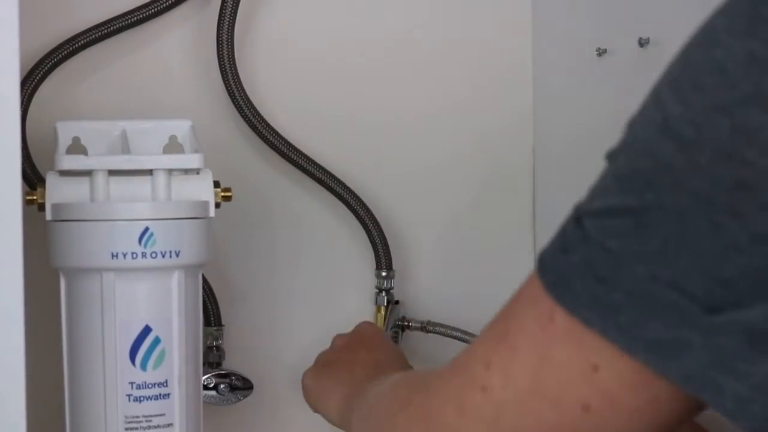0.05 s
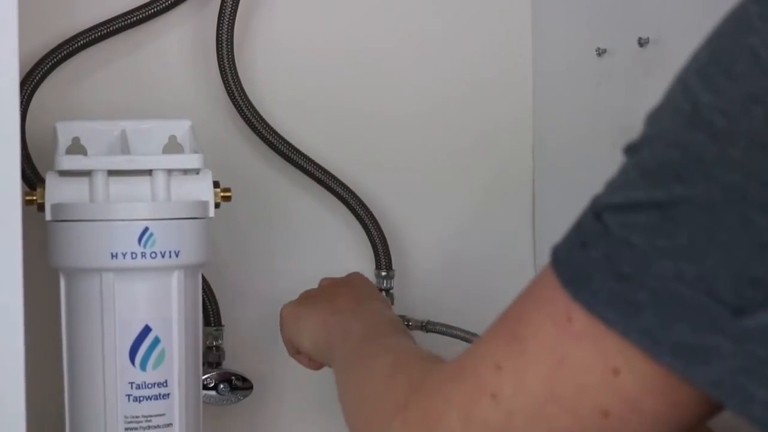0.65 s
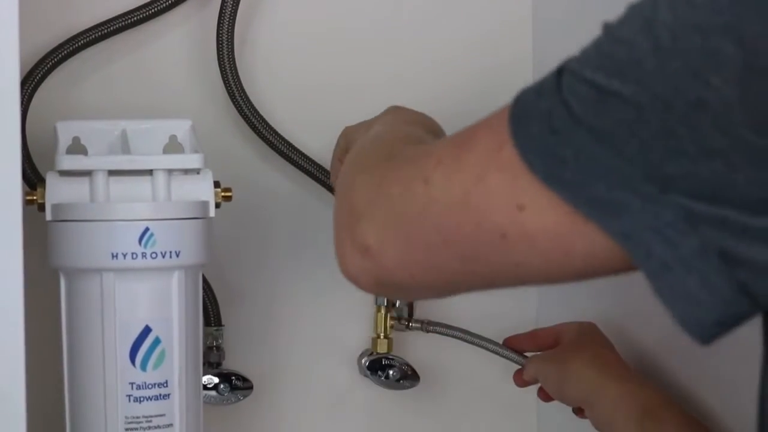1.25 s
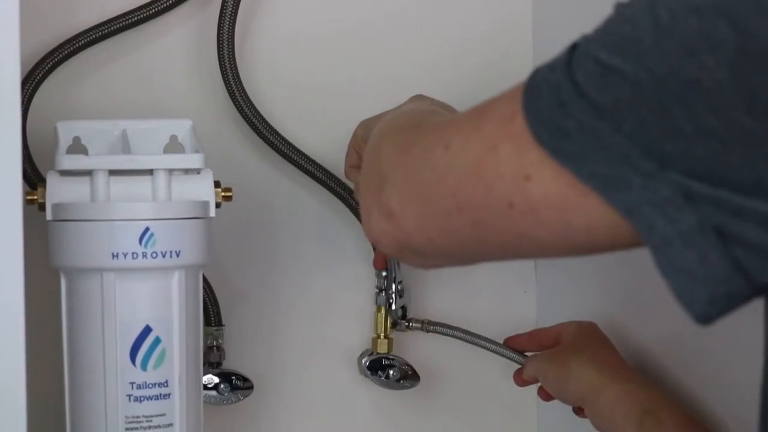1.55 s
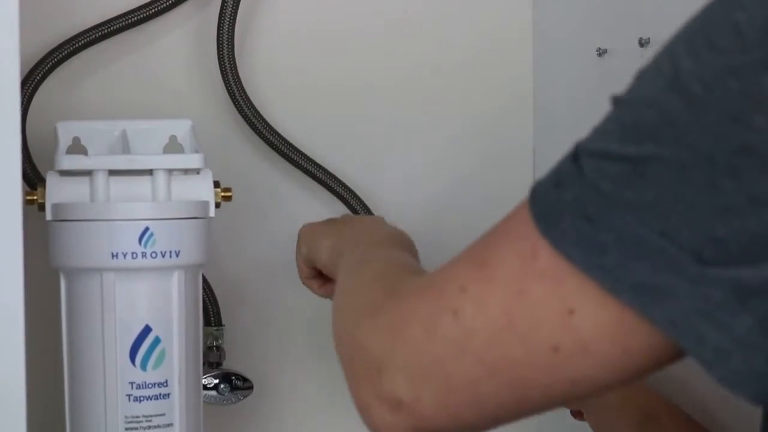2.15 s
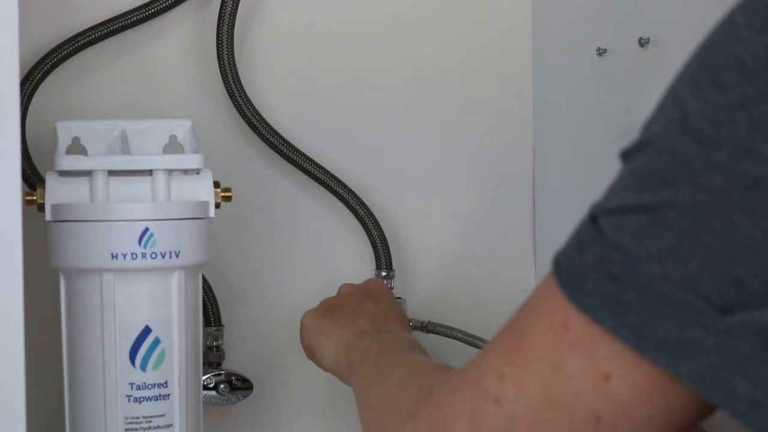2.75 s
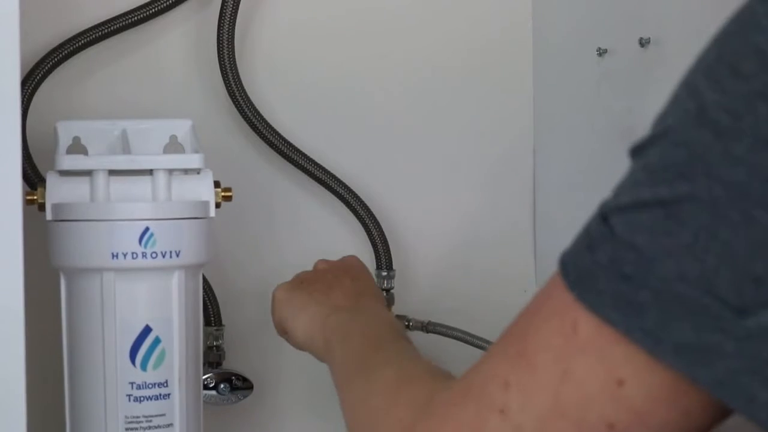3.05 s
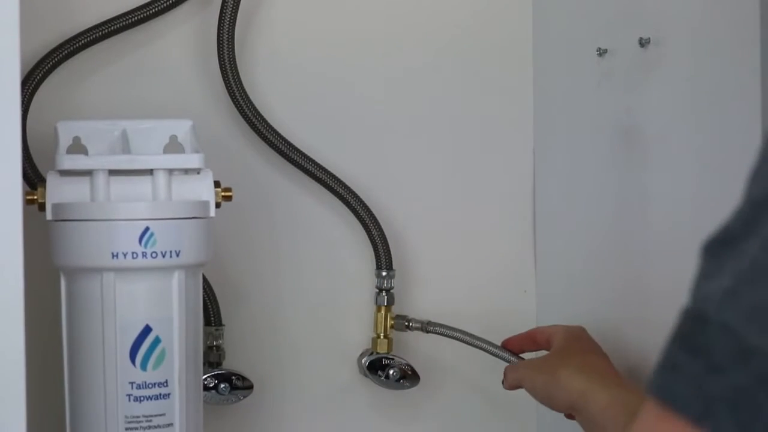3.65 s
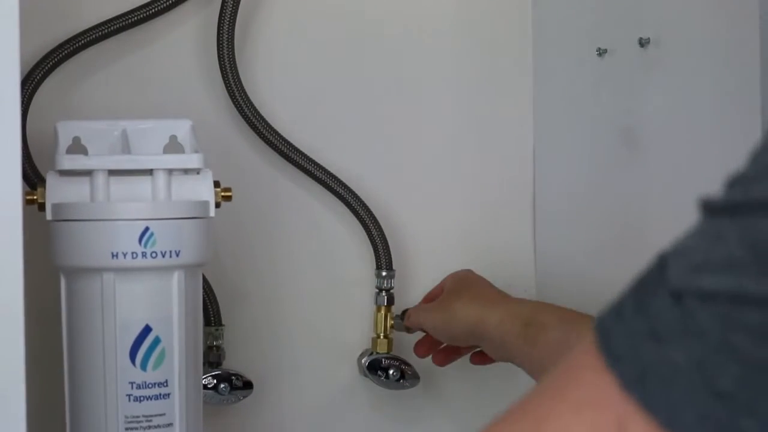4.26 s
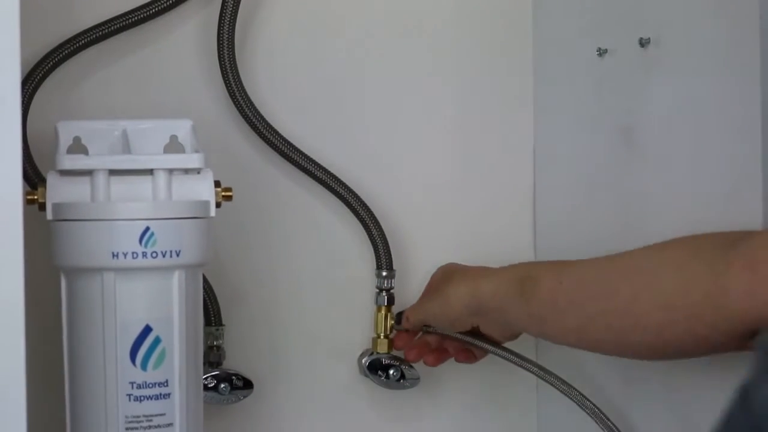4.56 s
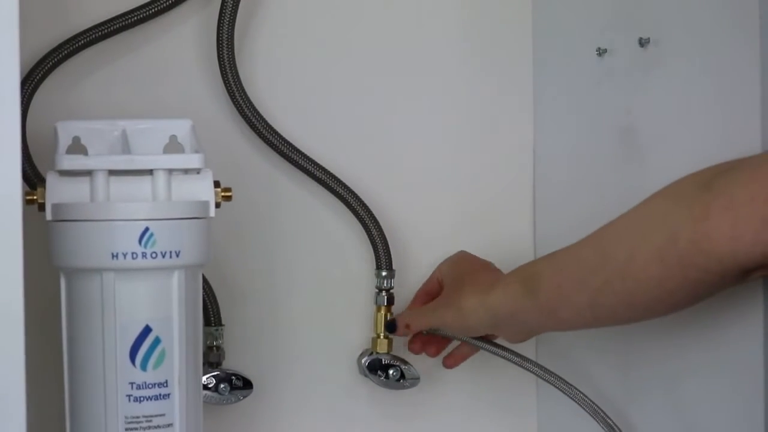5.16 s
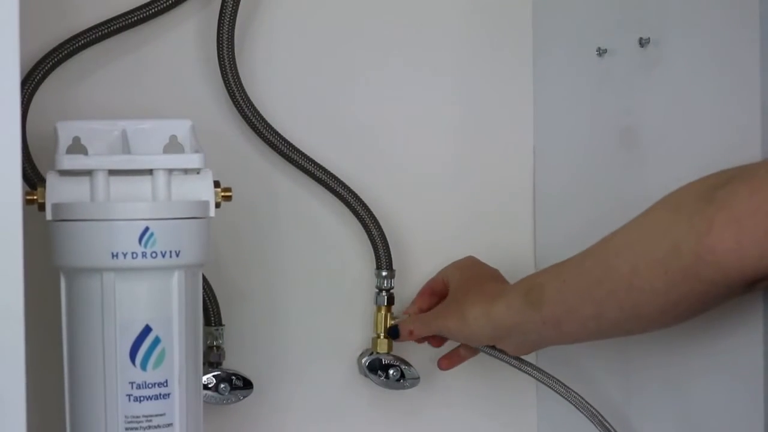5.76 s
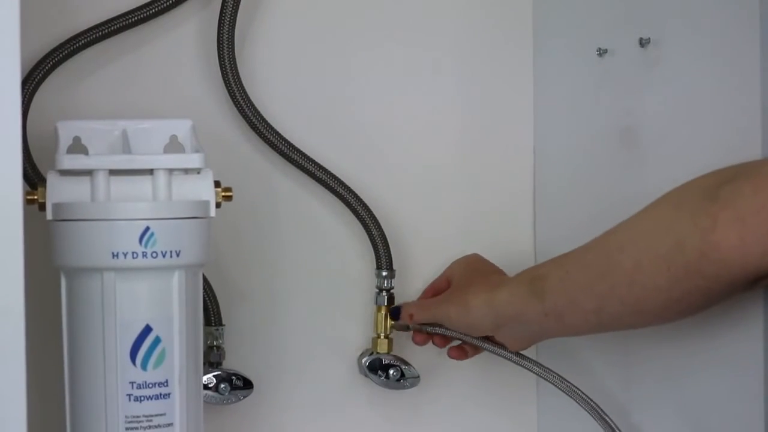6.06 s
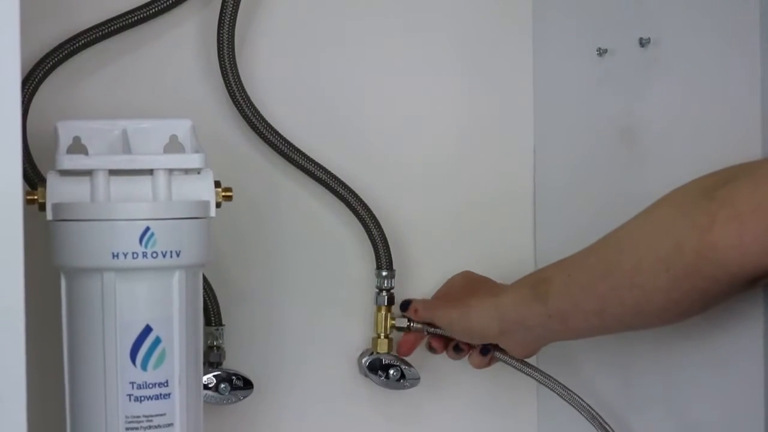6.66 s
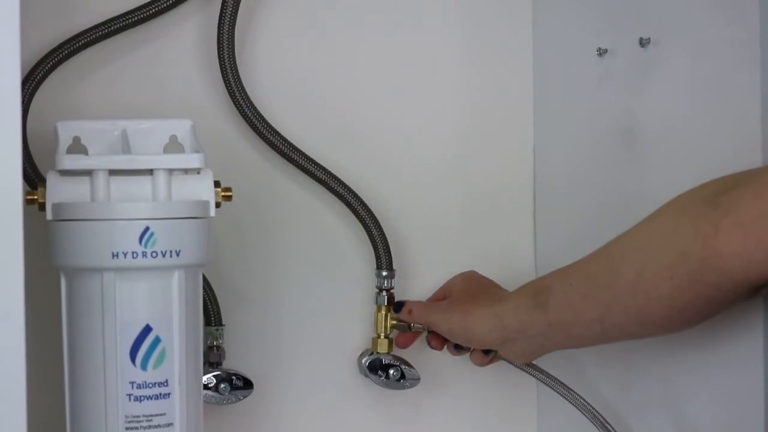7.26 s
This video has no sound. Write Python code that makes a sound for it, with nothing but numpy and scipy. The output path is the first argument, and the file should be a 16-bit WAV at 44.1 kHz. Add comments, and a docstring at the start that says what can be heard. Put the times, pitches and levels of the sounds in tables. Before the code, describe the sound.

Metallic clicks and short scrapes of a wrench loosening a pipe nut, a clunk as it is laid down, then light ticks.

```python
"""Wrench work under a kitchen sink

One microphone at the sink cabinet. A steel wrench clicks onto a hose nut and scrapes round in tiny
slips; the pipe carries each contact into the cabinet wall. The wrench is laid on the cabinet floor,
clinking, and fingers then turn the loose nut with small ticks. Close by, the cabinet gives dense early
echoes; farther out, the kitchen adds a soft tail and a faint steady hum."""
import sys
import numpy as np
from scipy import signal
from scipy.fft import rfft, irfft, next_fast_len
from scipy.io import wavfile
from scipy.ndimage import uniform_filter1d

SR = 44100
rng = np.random.default_rng(int(sys.argv[2]) if len(sys.argv) > 2 else 0)


def persist_wave(psi):
    """Save psi, clipped to +-1, as 16-bit WAV."""
    counts = np.round(np.clip(psi, -1, 1) * 32767).astype(np.int16)
    wavfile.write(sys.argv[1], SR, np.atleast_2d(counts).T)


N = 322812
TIME = np.arange(N) / SR
RING_TIME = np.arange(SR // 2) / SR
OVERTONE_RATIO = 1.98  # just under the octave

# modes of pipe, cabinet wall, gripped wrench and brass fitting: (frequency [Hz], level [dB], t60 [s])
PIPE_MODES = [(305, -7, .13), (385, -6, .12), (454, 2, .15), (518, -3, .11), (560, -3, .13), (640, -2, .1),
              (675, -2, .09), (738, -3, .11), (806, -6, .09), (926, -5, .11), (1130, -13, .07),
              (1240, -8, .08)]
WALL_MODES = [(80.7, 1, 0.75), (127, -25.5, 0.47), (146, -4, 0.58), (195.3, 10.5, 0.16), (212.7, 5.5, 0.24),
              (285, -9.5, 0.16)]
GRIPPED_MODES = [(2970, -3, .04), (3290, 0, .05), (3530, 0, .05), (3880, -3, .05), (4160, -6, .05),
                 (4690, 1, .05), (5570, 1, .05), (5700, -2, .03), (7940, -6, .04), (8890, 1, .025),
                 (9400, -1, .02), (12100, -1, .04)]
FITTING_MODES = [(935, -5, .04), (1130, -5, .03), (1215, 0, .045), (1290, -2, .035)]
# dense modes and cabinet echoes of a blow to pipe, wall and nut: (frequency [Hz], gain [dB])
PIPE_SPECTRUM = [(100, -38.5), (280, 8), (500, 8.5), (700, 12), (880, -13.5), (1280, -17), (1600, -22),
                 (2400, -34), (4000, -53)]
WALL_SPECTRUM = [(20, 0), (55, 6), (85, 14.5), (220, 15.5), (330, -15.5), (600, -64)]
NUT_KNOCK_SPECTRUM = [(150, 4.5), (450, 11), (900, 3), (1300, -3.5), (1800, -12), (3000, -33.5)]
# bright snap of metal on metal, and grit of steel sliding on the nut: (frequency [Hz], gain [dB])
SNAP_SPECTRUM = [(3000, -15.5), (6000, -4.5), (8900, 1), (10500, -9), (13000, -0.5), (16000, -10.5)]
GRIT_SPECTRUM = [(600, -31), (1500, 4), (2400, -5), (3400, 0), (4800, -4), (5700, -3), (7000, -12),
                 (9000, -14), (10600, -19), (12300, -19), (14000, -13), (16000, -37)]


def amp(db):
    """Decibels to gain."""
    return 10 ** (np.asarray(db) / 20)


def unit_rms(x):
    """Scales to rms 1."""
    return x / np.sqrt(np.mean(x ** 2) + 1e-20)


def unit_energy(x):
    """Scales to energy 1."""
    return x / np.sqrt(np.sum(x ** 2) + 1e-20)


def lookup(points, hz):
    """Reads a table on a log-frequency axis."""
    f, value = np.transpose(points)
    return np.interp(np.log(hz + 1), np.log(f), value)


def add(mix, s, sound):
    """Adds a sound into the mix at s seconds."""
    part = mix[max(round(s * SR), 0):][:len(sound)]
    part += sound[:len(part)]


def through(x, response):
    """Plays x through an impulse response."""
    return signal.oaconvolve(x, response)[:N]


def colour(x, spectrum):
    """Causal filter with the given spectrum."""
    size = next_fast_len(len(x) + SR // 8)
    log_gain = np.log(amp(lookup(spectrum, abs(np.fft.fftfreq(size, 1 / SR)))))
    response = np.exp(np.conj(signal.hilbert(log_gain)))[:size // 2 + 1]
    return irfft(rfft(x, size) * response, size)[:len(x)]


def resonate(x, hz, width_hz):
    """Two like resonances in series that follow the pitch curve hz."""
    turn = np.exp(2j * np.pi * np.cumsum(hz) / SR)
    pole = np.exp(-np.pi * width_hz / SR)
    for _ in range(2):
        x = 2 * (turn * signal.lfilter([1 - pole], [1, -pole], x / turn + 1e-18)).real
    return x


def dying_noise(t60s, t, count=8):
    """Dense echoes: noise whose bands each die at their own speed."""
    white, hz = rfft(rng.standard_normal(len(t))), np.fft.rfftfreq(len(t), 1 / SR)
    centres = np.geomspace(80, 15000, count)
    bands = [irfft(white * lookup(np.c_[centres, share], hz), len(t)) for share in np.eye(count)]
    return sum(band * amp(-60 * t / lookup(t60s, f)) for band, f in zip(bands, centres))


def ring(modes, in_step=False):
    """Damped modes: in step for a sharp attack, else of alternating sign."""
    t, sign = RING_TIME, 1 if in_step else -1
    sound = sum(sign ** k * amp(db - 60 * t / t60) * np.sin(2 * np.pi * hz * t)
                for k, (hz, db, t60) in enumerate(modes))
    low_cut = signal.butter(2, modes[0][0] / 2, "high", fs=SR)  # little radiates below the lowest mode
    return unit_energy(signal.lfilter(*low_cut, sound))


def blow(spectrum, direct=0.25, echo=0.45, echo_s=.002, build_s=.0016):
    """A tap as it reaches the microphone: the direct pulse, one cabinet wall echo, then dense echoes."""
    # ring time inside the cabinet: (frequency [Hz], t60 [s])
    cabinet_t60 = [(80, .3), (250, .15), (600, .085), (1500, .065), (5000, .052), (15000, .048)]
    taps = unit_energy(dying_noise(cabinet_t60, RING_TIME) * (1 - np.exp(-RING_TIME / build_s)))
    add(taps, 0, np.array([direct]))
    add(taps, echo_s, np.array([echo]))
    return unit_energy(colour(taps, spectrum))


def body(modes, spectrum, modal, in_step=False):
    """Clear modes, with the share modal of the energy, plus a dense spread that is new at each blow."""
    return unit_energy(np.sqrt(modal) * ring(modes, in_step) + np.sqrt(1 - modal) * blow(spectrum))


def scattered(sound, echoes=.9, echo_t60=0.025):
    """Echoes of a ringing tone interfere, so that it flutters as it dies."""
    taps = echoes * unit_energy(rng.standard_normal(len(RING_TIME)) * amp(-60 * RING_TIME / echo_t60))
    taps[0] += 1
    return unit_energy(signal.fftconvolve(sound, taps)[:len(RING_TIME)])


def regripped(modes, detune=.025, spread_db=2.5):
    """Each new grip shifts the modes a little in pitch and strength."""
    shifts = rng.standard_normal((len(modes), 2))
    return [(hz * (1 + detune * a), db + spread_db * b, t60)
            for (hz, db, t60), (a, b) in zip(modes, shifts)]


def gripped_ring(modes, pitch, db_per_octave=13):
    """The held steel rings most in the modes nearest the pitch of the contact."""
    focused = [(hz, db - db_per_octave * abs(np.log2(hz / pitch)), t60) for hz, db, t60 in modes]
    return scattered(ring(focused))


def slips(per_s, spread_db):
    """A random train of small jerks, as in stick and slip, rms 1."""
    size = amp(spread_db * np.minimum(rng.exponential(1, N), 3))
    return unit_rms(size * rng.choice([-1, 1], N) * (rng.random(N) < per_s / SR))


def stroke(length, crest, swell_db, fade_db, edge_s=0.0051):
    """Gain that swells up to its crest (a share of the length), then fades."""
    u = np.linspace(0, 1, round(length * SR))
    edges = np.minimum(np.minimum(u, 1 - u) * length / edge_s, 1)
    return edges * amp(np.interp(u, [0, crest, 1], [-swell_db, 0, -fade_db]))


def strokes(rows, crest, swell_db, fade_db):
    """Gain over time of like swells, silent between them."""
    gain = np.zeros(N)
    for s, length, db in rows:
        add(gain, s, amp(db) * stroke(length, crest, swell_db, fade_db))
    return gain


def room_tone(air_db=-66.5, waver=0.087):
    """Still kitchen air and the slightly wavering hum of an appliance."""
    # spectrum of the air, and tones of the hum: (frequency [Hz], level [dB])
    air_spectrum = [(12, -31.5), (20, -5.5), (87, -7), (126, -7), (153, -11), (202, -10.5), (324, -16.5),
                    (352, -9.5), (382, -16.5), (519, -16.5), (932, -26), (1230, -27.5), (1340, -32),
                    (3450, -39), (15500, -44.5)]
    hum_tones = [(355.3, -70.5), (517, -87)]
    out = amp(air_db) * unit_rms(colour(rng.standard_normal(N), air_spectrum))
    for hz, db in hum_tones:
        drift = unit_rms(uniform_filter1d(rng.standard_normal(N), SR // 6))
        out += amp(db) * np.sqrt(2) * (1 + waver * drift) * np.sin(2 * np.pi * hz * TIME)
    return out


def soft_bumps(rise_s=0.0073):
    """Handling bumps: low tones that swell and die almost at once."""
    # bumps: (time [s], level [dB], pitch [Hz])
    bumps = [(0.074, -40, 56), (0.126, -43.5, 50), (2.824, -43, 186), (4.78, -56, 169), (4.87, -41.5, 62.4),
             (4.89, -45.5, 95), (4.966, -51, 115.5), (5.224, -54, 43.9), (5.253, -51, 47.2),
             (6.414, -52, 68), (6.429, -58, 138), (6.471, -55.5, 76), (6.555, -56, 109)]
    out, u = np.zeros(N), RING_TIME / rise_s
    for s, db, hz in bumps:
        add(out, s, -amp(db) * u * np.exp(1 - u) * np.sin(2 * np.pi * hz * RING_TIME))
    return out


def wrench_contacts(knock_db=17, thud_db=26, click_db=27, ring_db=24, fitting_db=20, snap_db=22):
    """Each contact clicks and rings in steel and fitting, then knocks the pipe and shakes the wall."""
    # wrench meets nut: (time [s], pipe knock [dB], wall thud [dB], steel click [dB], steel ring [dB],
    # ring pitch [Hz], fitting ring [dB], snap [dB])
    contacts = [(0.0747, -34, -42, -68, -67, 3520, -67, -63.5),
                (0.246, -36, -46, -62.5, -72, 4740, -57, -58),
                (0.258, -39.5, -47, -70, -60, 3250, -60, -55), (1.194, -84, -69, -71, -68, 2980, -80, -59),
                (1.2488, -21, -35, -50.5, -48.5, 5950, -40, -47),
                (1.2666, -31, -32, -47.5, -52, 5600, -36, -39),
                (1.457, -20, -34.5, -37.5, -48, 4080, -33, -43),
                (1.802, -29, -37.5, -69, -72, 5700, -51, -76), (1.962, -54, -59, -90, -87, 3330, -64, -88),
                (2.087, -43.5, -54, -73.5, -63.5, 4900, -54.5, -86),
                (2.512, -70, -44, -74, -82, 4700, -68, -90), (2.529, -48.5, -50, -88, -73, 3100, -66, -85),
                (2.683, -42, -52, -74, -68.5, 3550, -62, -87),
                (2.691, -40.5, -62, -68, -73, 4700, -68, -78),
                (2.729, -52, -46.5, -80, -69, 3700, -68, -85), (2.825, -48, -45, -95, -92, 3350, -70, -95),
                (3.003, -28.5, -58, -53, -53, 5500, -44, -82),
                (3.037, -36.5, -74, -72, -63, 5600, -62, -73),
                (3.092, -26.5, -47, -64, -56, 3500, -61, -54),
                (3.733, -52.5, -66, -94, -96, 3300, -91, -95)]
    # steel click: (frequency [Hz], gain [dB])
    click_spectrum = [(600, -38), (1500, 2.5), (2300, 0), (2750, 0.5), (3400, 4), (4100, 3.5), (4800, 5),
                      (5700, 4.5), (7000, -14.5), (9000, -10), (10600, -23), (12300, -7), (14000, -33),
                      (16000, -21)]
    pipe_lag_s, wall_lag_s = 0.001896, 0.00338
    out = np.zeros(N)
    for s, knock, thud, click, steel, pitch, fitting, snap in contacts:
        pipe = body(PIPE_MODES, PIPE_SPECTRUM, modal=0.34, in_step=True)
        wall = body(WALL_MODES, WALL_SPECTRUM, modal=0.72)
        add(out, s + pipe_lag_s, amp(knock + knock_db) * pipe)
        add(out, s + wall_lag_s, amp(thud + thud_db) * wall)
        add(out, s, amp(click + click_db) * blow(click_spectrum, direct=0.26, echo=0.12))
        add(out, s, amp(snap + snap_db) * blow(SNAP_SPECTRUM))
        add(out, s, amp(steel + ring_db) * gripped_ring(GRIPPED_MODES, pitch))
        add(out, s, amp(fitting + fitting_db) * ring(regripped(FITTING_MODES)))
    return out


def nut_ticks(tick_db=15, knock_db=17, snap_db=6, ping_db=13, overtone_db=-20.5):
    """The slack nut taps its thread; the fingers damp its ring."""
    # light taps: (time [s], dry tick [dB], ring [dB], ring pitch [Hz], pipe knock [dB])
    taps = [(0.1353, -66, -59.5, 3830, -51), (0.2087, -70, -65, 3600, -51), (4.241, -75, -58, 3020, -83),
            (3.387, -68, -50.5, 2100, -84), (3.4405, -64, -68, 1980, -77),
            (4.9338, -53.5, -55, 3320, -48.5), (5.0311, -68, -59.5, 3487, -50.5),
            (5.503, -66, -67, 3630, -74), (5.7422, -60.5, -61, 2720, -51), (5.781, -51.5, -51, 3280, -50),
            (5.7888, -50, -47, 1830, -46), (6.121, -72, -69, 1880, -51), (6.407, -82, -82, 3000, -53),
            (6.4311, -75, -64, 3280, -50), (6.458, -79, -71, 2900, -57), (6.4746, -72, -61, 1850, -58),
            (6.503, -65.5, -68, 3670, -57), (6.555, -65, -58.5, 3100, -60), (6.759, -80, -69, 2830, -80),
            (6.784, -66, -55.5, 3150, -80), (6.787, -72, -60, 2590, -89), (6.819, -69, -80, 2780, -79),
            (6.926, -75, -78, 4270, -73), (6.936, -67.5, -63, 3130, -78), (6.9774, -69, -64, 3850, -78),
            (7.107, -64.5, -60.5, 2400, -54), (7.127, -77, -66, 3200, -52.5), (7.165, -54, -69, 3260, -50),
            (7.169, -39.5, -42, 3930, -52.5), (7.231, -71, -62.5, 2840, -51.5)]
    # dry tick: (frequency [Hz], gain [dB])
    tick_spectrum = [(500, -39.5), (1000, -2), (1320, 18), (2200, -4.5), (3800, 10), (5200, 8.5),
                     (6500, -12), (8000, -0.5), (10000, -11.5), (13000, -4.5), (16000, -36)]
    out = np.zeros(N)
    for s, db, ring_db, hz, knock in taps:
        tick = blow(tick_spectrum, direct=.4, echo=0.3, build_s=0.001)
        ping = scattered(ring([(hz, 0, .022), (hz * OVERTONE_RATIO, overtone_db, .014)]))
        add(out, s, amp(db + tick_db) * tick + amp(ring_db + ping_db) * ping)
        add(out, s, amp(knock + knock_db) * blow(NUT_KNOCK_SPECTRUM, direct=.1, echo=0.083))
        add(out, s, amp(db + snap_db) * blow(SNAP_SPECTRUM))
    return out


def scrapes(groan_db=-5, judder_db=-5, rumble_db=-3, grit_db=-4, rasp_db=-6, sing_db=-4):
    """Jaws slide on nut, or nut on thread: fine slips shake pipe and wall, coarse ones the metal."""
    # strokes: (start [s], length [s], crest [share of length], pipe groan [dB], judder [dB],
    # wall rumble [dB], steel grit [dB], fitting ring [dB], judder pitch [Hz], glide [octaves])
    moves = [(0.481, 0.034, 0.27, -42.5, -69, -35, -68, -47.5, 1030, 0.25),
             (0.501, 0.063, 0.63, -41.5, -46, -40, -60, -54, 725, -0.34),
             (0.567, 0.044, 0.17, -48.5, -46, -36, -63, -53, 660, -0.25),
             (0.62, 0.0792, 0.4, -45.5, -41.5, -41, -59.5, -45, 700, 0.27),
             (1.347, 0.098, 0.14, -51, -41.5, -45, -85, -58, 700, 0.45),
             (1.391, 0.082, 0.43, -31.5, -30, -41, -53, -46, 707, -0.35),
             (1.689, 0.086, 0.68, -37.5, -38, -35, -60, -50, 920, 0.18),
             (1.73, 0.08, 0.35, -42, -38, -45.5, -61, -44, 885, 0.36),
             (1.954, 0.061, 0.053, -53, -56.5, -48.5, -100, -72, 920, -0.23),
             (2.251, 0.11, 0.99, -53, -57, -55.5, -76, -66, 730, -0.41),
             (2.507, 0.065, 0.3, -53, -53.5, -71, -76, -61.5, 660, 0.19),
             (2.695, 0.11, 0.23, -52, -60, -47.5, -81, -64.5, 650, 0.093),
             (2.944, 0.068, 0.78, -39.5, -45, -40, -64.5, -64, 620, -0.18),
             (3.008, 0.048, 0.7, -35, -40, -63, -57, -48, 660, -0.31),
             (3.031, 0.066, 0.74, -29.5, -32, -53, -56.5, -50, 543, -0.42),
             (6.87, 0.062, 0.35, -74, -55, -75, -89, -88, 520, -0.35),
             (7.178, 0.13, 0.69, -60.5, -56, -64.5, -79, -78, 467, 0.066)]
    # the rasping nut: (frequency [Hz], level [dB], t60 [s])
    rasp_modes = [(1850, 0, .015), (2230, -3, .015), (2970, -1, .022), (3335, 2, .03), (3530, -3, .02),
                  (4270, -6, .015), (4610, -4, .02), (5150, -7, .02), (5480, -6, .02), (5910, -8, .02)]
    fine, coarse = slips(per_s=900, spread_db=4), slips(per_s=320, spread_db=3)
    pipe, judder, wall, steel, sing = np.zeros((5, N))
    for s, length, crest, on_pipe, on_judder, on_wall, on_steel, on_fitting, hz, glide in moves:
        grip = stroke(length, crest, swell_db=23, fade_db=11.5)  # tightens, then slackens
        jerks = unit_rms(fine[round(s * SR):][:len(grip)])
        crackle = unit_rms(coarse[round(s * SR):][:len(grip)])
        add(pipe, s, amp(on_pipe) * grip * jerks)
        add(wall, s, amp(on_wall) * grip * jerks)
        add(steel, s, amp(on_steel) * grip * crackle)
        nut = amp(on_steel + rasp_db) * ring(regripped(rasp_modes))
        fitting = amp(on_fitting + sing_db) * ring(regripped(FITTING_MODES))
        add(sing, s, signal.fftconvolve(grip * crackle, nut + fitting))
        # the slips bunch round a pitch that glides during the stroke
        pitch = hz * 2 ** (glide * np.linspace(-.5, .5, len(grip)))
        add(judder, s, amp(on_judder) * grip * unit_rms(resonate(jerks, pitch, width_hz=160)))
    echoes = scattered(signal.unit_impulse(len(RING_TIME)), echoes=1.0, echo_t60=0.03)
    judder = amp(judder_db) * through(judder, echoes)
    groan = amp(groan_db) * through(pipe, body(PIPE_MODES, PIPE_SPECTRUM, modal=1.0))
    rumble = amp(rumble_db) * through(wall, body(WALL_MODES, WALL_SPECTRUM, modal=0.51))
    grit = amp(grit_db) * through(steel, blow(GRIT_SPECTRUM, direct=0.2, echo=0.76))
    return groan + judder + rumble + grit + sing


def wrench_catches(tick_db=10, ring_db=8, knock_db=14):
    """Within a scrape the jaws snag on a corner of the nut and let go with sharp ticks."""
    # snags: (time [s], steel tick [dB], pipe knock [dB], ring pitch [Hz])
    catches = [(0.492, -67, -42, 3240), (0.526, -65, -34, 3400), (0.5461, -59, -44, 4700),
               (0.5868, -57, -47, 3100), (0.633, -58, -39, 4600), (0.645, -59, -37, 3400),
               (0.6536, -64, -50, 3500), (0.678, -52, -43, 3600), (1.42, -45, -29.5, 9200),
               (1.699, -72, -38, 3300), (1.723, -57, -44, 3230), (1.7405, -47, -40, 3300),
               (1.751, -46.5, -44, 3400), (1.762, -48, -32, 9400), (1.784, -46.5, -48, 3400),
               (2.964, -64, -43, 4700), (2.985, -67, -46, 3500)]
    out = np.zeros(N)
    for s, steel, knock, pitch in catches:
        add(out, s, amp(steel + tick_db) * blow(GRIT_SPECTRUM, direct=.7, echo=.4, build_s=.0008))
        add(out, s, amp(steel + ring_db) * gripped_ring(regripped(GRIPPED_MODES), pitch))
        add(out, s, amp(knock + knock_db) * blow(NUT_KNOCK_SPECTRUM, direct=0.23, echo=.4))
    return out


def sleeve_brushes(gain_db=1):
    """The sleeve brushes as the arm moves: dense slips merge into a rustle."""
    # arm moves: (start [s], length [s], level [dB])
    moves = [(0.66, 0.38, -73.5), (3.2, 0.33, -73), (4.53, 0.47, -71.5), (4.95, 0.38, -75.5)]
    # cloth: (frequency [Hz], gain [dB])
    cloth_spectrum = [(300, -10), (900, 11.5), (2000, 5.5), (3500, -0.5), (8000, -6), (13000, -10),
                      (16000, -18)]
    rustle = unit_rms(colour(slips(per_s=5200, spread_db=0), cloth_spectrum))
    return amp(gain_db) * strokes(moves, crest=0.52, swell_db=8, fade_db=8) * rustle


def afterrings(swell_s=0.0062, t60_s=0.47):
    """A faint, fuzzy ring and its overtone linger after some contacts."""
    # lingering rings: (time [s], level [dB], pitch [Hz], overtone [dB])
    rings = [(0.681, -78, 2240, -2), (1.457, -62, 3620, -40), (1.458, -77, 5300, -30),
             (5.785, -78, 4728, -21), (7.167, -77, 3850, 3), (7.17, -77, 5130, -30.5)]
    out, t = np.zeros(N), RING_TIME
    fade = (1 - np.exp(-t / swell_s)) * amp(-60 * t / t60_s)
    for s, db, hz, overtone_db in rings:
        for pitch, level in (hz, db), (hz * OVERTONE_RATIO, db + overtone_db):
            band = resonate(rng.standard_normal(len(t)), np.full(len(t), pitch), width_hz=540)
            add(out, s, amp(level) * fade * unit_rms(band))
    return out


def wrench_slide_off():
    """Leaving the nut, the wrench is held loosely and the slips make its steel sing."""
    # the slide: (start [s], length [s], level [dB])
    slide = [(3.012, .098, -56)]
    # loosely held steel: (frequency [Hz], level [dB], t60 [s])
    loose_modes = [(5680, 0, .02), (8850, -2, .014), (9400, -5, .01), (12300, -9, .008)]
    drive = strokes(slide, crest=0.75, swell_db=32, fade_db=12) * slips(per_s=1000, spread_db=2)
    return through(drive, scattered(ring(loose_modes)))


def rattling(sound, cutoff_hz=110, depth=.55):
    """The wrench chatters on the board, so that its ring flutters."""
    chatter = signal.lfilter(*signal.butter(2, cutoff_hz, fs=SR), rng.standard_normal(len(sound)))
    return unit_energy(sound * (1 + depth * unit_rms(chatter)))


def wrench_set_down(knock_db=12, slap_db=17, clack_db=22, hard_db=21, shank_db=24, jaws_db=22,
                    snap_db=18):
    """The wrench touches the cabinet's floor board, rocks and drops flat, ringing freely."""
    # landings: (time [s], slap [dB], board ring [dB], clack [dB], shank [dB], jaws [dB], snap [dB])
    landings = [(3.883, -14, -17, -41.5, -57, -79, -71), (3.894, -44.5, -37, -63.5, -72.5, -61, -56),
                (3.905, -23, -29, -45.5, -69, -72, -72), (3.908, -30.5, -31.5, -43.5, -46.5, -32.5, -35),
                (3.99, -52, -52.5, -67.5, -64.5, -72, -62), (4.085, -47.5, -42.5, -71.5, -82.5, -94.5, -90),
                (4.098, -47.5, -37.5, -65.5, -68.5, -83.5, -76),
                (4.152, -35, -26, -61.5, -69.5, -84, -72.5), (4.186, -42.5, -27, -62.5, -68.5, -87, -77),
                (4.2789, -32.5, -26.5, -40.5, -35.5, -52, -41), (4.297, -47, -41, -60.5, -47, -58.5, -54),
                (4.3208, -14, -13.5, -18, -46, -42, -38.5), (4.328, -27, -23.5, -33, -48, -36, -36),
                (4.344, -30, -25.5, -40.5, -43, -44, -39.5)]
    # modes of board, board when hit hard, shank and jaws: (frequency [Hz], level [dB], t60 [s])
    board_modes = [(400, -16, .07), (560, -1, .14), (608, -2, .1), (680, -6, .05), (736, 0, .12),
                   (804, -2, .09), (925, -8, .05), (1082, -7, .07), (1350, -9, .045)]
    hard_modes = [(216, -2, .13), (255, -6, .1), (340, -2, .09), (458, 4, .11), (1020, -1, .04),
                  (1248, 1, .07), (1470, 5, .05), (1560, -3, .03), (1703, 2, .05), (1916, 0, .04),
                  (2130, -3, .025), (2390, 0, .03), (2950, -1, .02), (3500, -2, .018), (4650, -2, .016)]
    shank_modes = [(5528, -9, .045), (5556, 0, .068), (5640, -6, .03)]
    jaw_modes = [(8720, -15, .04), (8850, -13, .07), (8960, -14, .04), (9440, -16, .04), (12050, -14, .025),
                 (13100, -13, .025), (14300, -4, .025), (14470, 0, .04), (14640, -1, .03), (14850, -6, .02)]
    # slap and hard clack on the board: (frequency [Hz], gain [dB])
    slap_spectrum = [(50, -41), (110, -21), (200, -18.5), (300, -13), (480, 2.5), (740, 3.5), (950, -2.5),
                     (1350, -8), (1900, -20.5), (3500, -51.5)]
    clack_spectrum = [(100, -23.5), (200, -1), (400, -3.5), (700, -4.5), (1000, 7), (1500, 3.5),
                      (2500, 4.5), (4500, -4.5), (5600, -6), (7000, -15), (10500, -21.5), (13000, -10.5),
                      (16000, -31.5)]
    out = np.zeros(N)
    for s, slap, knock, clack, shank, jaws, snap in landings:
        add(out, s, amp(knock + knock_db) * ring(board_modes, in_step=True))
        add(out, s, amp(slap + slap_db) * blow(slap_spectrum, direct=1.0, echo=1.7, echo_s=.0014))
        add(out, s, amp(clack + clack_db) * blow(clack_spectrum, direct=0.54, echo=0.18, echo_s=.0022))
        add(out, s, amp(clack + hard_db) * ring(hard_modes))
        add(out, s, amp(shank + shank_db) * rattling(ring(shank_modes)))
        add(out, s, amp(jaws + jaws_db) * rattling(ring(jaw_modes)))
        add(out, s, amp(snap + snap_db) * blow(SNAP_SPECTRUM))
    return out


def dry_snaps(gain_db=3):
    """Tiny snaps close to the microphone: one high mode that dies at once."""
    # snaps: (time [s], level [dB])
    snaps = [(4.623, -50), (4.6997, -59), (4.7848, -50.5), (4.8253, -44.5), (4.884, -46.5), (4.897, -51),
             (4.9915, -51)]
    out = np.zeros(N)
    for s, db in snaps:
        add(out, s, amp(db + gain_db) * ring([(7400, 0, 0.0005)]))
    return out


def faint_hisses(gain_db=-1):
    """Fingers rub nut and braid; the final hiss is the room dying away after the last sharp click."""
    # hisses: (start [s], length [s], level [dB])
    hisses = [(5.02, 0.21, -75.5), (5.42, 0.096, -67.5), (5.725, 0.1, -70), (6.42, 0.16, -76.5),
              (6.755, 0.11, -80), (6.88, 0.08, -72), (7.18, 0.095, -82.5)]
    # colour of the hiss: (frequency [Hz], gain [dB])
    hiss_spectrum = [(600, 4), (1500, -3), (3000, 0), (4800, -8.5), (6500, -14), (14000, -22)]
    hiss = unit_rms(through(slips(per_s=300, spread_db=1), blow(hiss_spectrum)))
    return amp(gain_db) * strokes(hisses, crest=.35, swell_db=2, fade_db=5) * hiss


def kitchen_tail(x, wet_db=-17, paths=4, swell_s=.018, blur_hz=160):
    """The room beyond the cabinet: sound wanders between several paths, blurring the tail's pitch."""
    # ring time of the kitchen: (frequency [Hz], t60 [s])
    kitchen_t60 = [(100, .45), (500, .52), (2000, .44), (4500, .43), (8000, .62), (15000, .5)]
    # what the kitchen gives back: (frequency [Hz], gain [dB])
    kitchen_spectrum = [(80, -11.5), (200, -8), (330, -6), (600, -11), (1300, -6.5), (2000, -1),
                        (3200, -1.5), (4200, -4), (5200, -10.5), (7000, -12), (9000, -11.5), (10500, -13),
                        (12000, -12), (14000, -17)]
    t = np.arange(SR) / SR
    swell = (1 - np.exp(-t / swell_s)) ** 2
    shares = signal.lfilter(*signal.butter(2, blur_hz, fs=SR), rng.standard_normal((paths, N)))
    shares /= np.sqrt(np.sum(shares ** 2, axis=0) + 1e-30)  # constant total power
    tails = [colour(dying_noise(kitchen_t60, t) * swell, kitchen_spectrum) for _ in range(paths)]
    return amp(wet_db) * sum(through(x * share, unit_energy(tail)) for share, tail in zip(shares, tails))


def scene():
    """The work under the sink with the kitchen around it, at one microphone."""
    work = wrench_contacts() + scrapes() + wrench_catches() + wrench_slide_off()
    work += wrench_set_down() + nut_ticks()
    lingering = kitchen_tail(work) + afterrings()
    small_sounds = faint_hisses() + sleeve_brushes() + dry_snaps() + soft_bumps()
    return (work + lingering + small_sounds + room_tone())[None]


def record(dry, edge_hz=15900):
    """A steep low-pass behind the microphone takes off the highest treble."""
    low_pass = signal.firwin(301, edge_hz, window=("kaiser", 8), fs=SR)
    return signal.oaconvolve(dry, low_pass[None], "same")


dry = scene()
out = record(dry)
persist_wave(out)
```